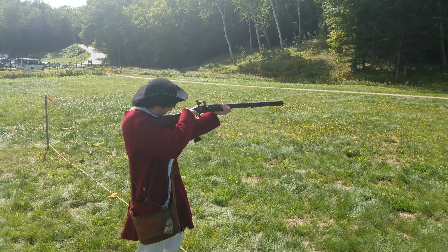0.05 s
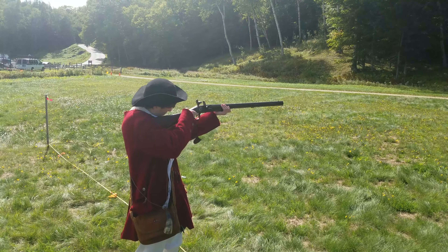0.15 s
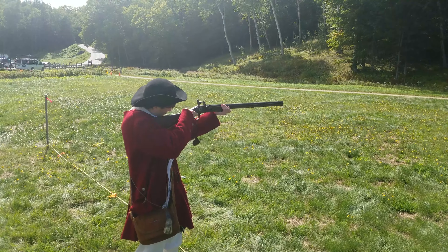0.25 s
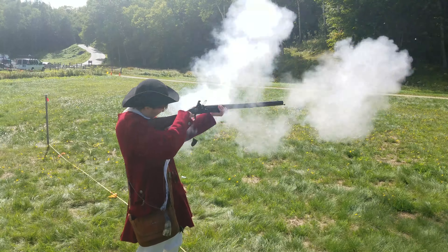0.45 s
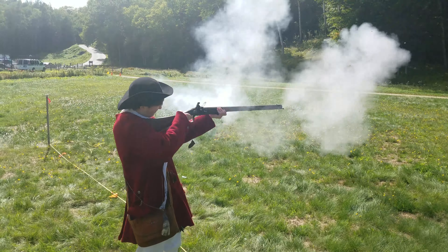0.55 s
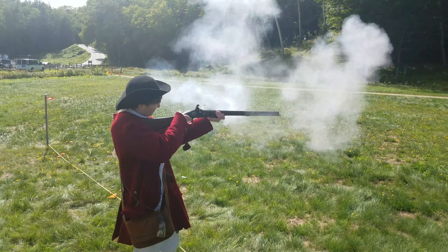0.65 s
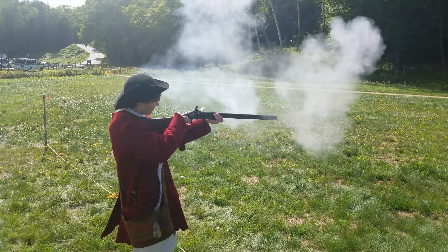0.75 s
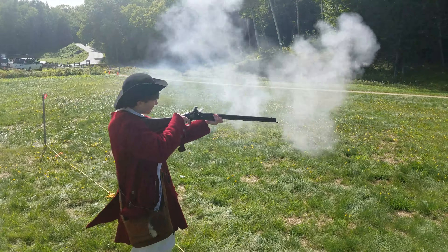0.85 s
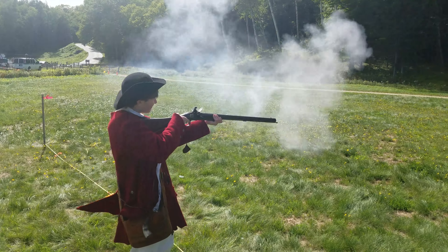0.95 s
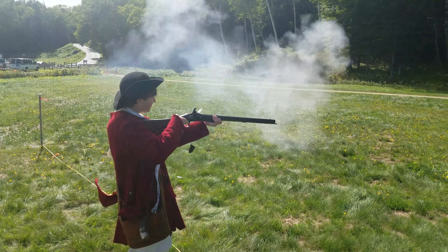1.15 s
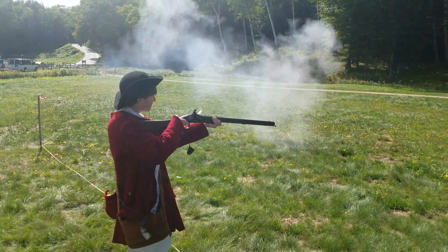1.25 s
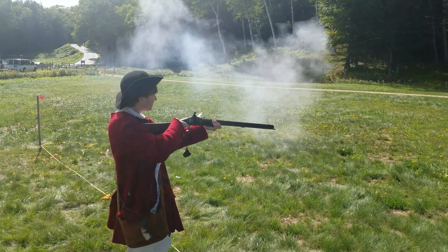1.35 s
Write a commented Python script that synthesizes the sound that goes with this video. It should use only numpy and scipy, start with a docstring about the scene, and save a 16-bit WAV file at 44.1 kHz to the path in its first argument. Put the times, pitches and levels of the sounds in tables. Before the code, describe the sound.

A flintlock musket fires once, close by in an open field. Faint wind brushes the microphone, and the lock scrapes and clicks at 0.2 seconds. At 0.3 seconds comes the loud, sharp, slightly overloaded report with a brief hiss of gas. A crisp echo slaps back near 0.5 seconds, followed by duller echoes from the trees, fading into a faint distant rumble until about 1.4 seconds.

```python
"""Flintlock shot in a meadow

Flint scrapes steel, the priming puffs, and the charge sends out a shock wave that overloads a nearby
microphone; gas hisses out after it. A hard surface slaps the report back, the edge of a wood scatters it
trunk by trunk, and a far slope rumbles last. A light wind brushes the microphone."""
import sys
import numpy as np
from scipy import signal
from scipy.fft import rfft, irfft, next_fast_len
from scipy.io import wavfile

SR = 44100
rng = np.random.default_rng(int(sys.argv[2]) if len(sys.argv) > 2 else 0)


def put_to_file(sound):
    """Save the sound as 16-bit audio at rate SR, in the file named by the first command-line argument."""
    columns = np.atleast_2d(sound).T  # one column per channel
    safe = np.clip(columns, -1, 1)
    whole_steps = np.round(safe * 32767)
    wavfile.write(sys.argv[1], SR, whole_steps.astype(np.int16))


N = 61739

# noise bursts: start/s, attack/s, hold/s, t60/s, level/dB
FLINT = (.197, .014, .003, .07, -23)
FRIZZEN = (.2105, .003, .005, .045, -23)
FIZZ = (.232, .01, .04, .04, -50)
PRIMING = (.259, .008, .014, .07, -33)
VENT = (.2922, .003, .002, .02, -19)
BLAST = (.2972, .0006, .009, .135, -6)
CRACK = (.2975, .0002, .001, .012, -5.5)
THUMP = (.302, .013, .005, .27, -25.5)
GAS = (.31, .02, .033, .16, -23.5)
HISS = (.35, .02, .06, .2, -37)
LOCK_ECHO = (.447, .007, .005, .05, -34)
SLAP = (.4803, .0012, .0029, .009, -10)
SLAP_THUMP = (.4805, .002, .004, .12, -30)
SLAP_TAIL = (.483, .002, .002, .08, -26)
BRUSH = (.49, .028, .03, .1, -33.5)
HOLLOW = (.645, .015, .03, .2, -32)
DEEP_WOOD = (.724, .022, .022, .28, -32)

# spectra of wind and background hiss: f/Hz, relative level/dB
WIND_SPECTRUM = [(20, -12), (70, 0), (140, -2), (300, -14), (600, -22), (2000, -42), (8000, -75)]
AIR_SPECTRUM = [(30, 0), (70, -1), (150, 0), (300, -7), (600, -18), (1500, -24), (4000, -28), (6000, -31),
                (8000, -37), (11000, -38), (15000, -40)]
# spectra of the lock and its priming: f/Hz, relative level/dB
FLINT_SPECTRUM = [(300, -36), (900, -10), (1500, -1), (2400, -1), (3400, -5), (4500, -2), (5300, -3),
                  (6500, -11), (8000, -14), (11000, -5), (15000, -12)]
FRIZZEN_SPECTRUM = [(250, -36), (450, -28), (610, 0), (760, -8), (900, 2), (1100, -8), (1600, -2),
                    (2400, -9), (3400, -11), (5000, -8), (6500, -15), (8000, -20), (11000, -8),
                    (15000, -14)]
PRIMING_SPECTRUM = [(100, -7), (250, 0), (500, -6), (800, -3), (1600, -9), (3000, -19), (5500, -21),
                    (8000, -29), (11000, -26), (15000, -29)]
# spectra of the discharge: f/Hz, relative level/dB
VENT_SPECTRUM = [(100, -14), (350, 0), (1000, 0), (1800, -5), (3000, -9), (4500, -2), (6200, -3),
                 (8000, -18), (11000, -15), (15000, -20)]
BLAST_SPECTRUM = [(40, -20), (100, -8), (200, -4), (360, 2.5), (560, -3), (800, -6), (1100, 3),
                  (1900, -2.5), (2500, -1), (4000, -4), (6500, -7), (7800, -21), (9300, -8), (10500, -7),
                  (15000, -8.5)]
CRACK_SPECTRUM = [(200, -14), (1200, 0), (5500, 0), (7800, -12), (10000, -3), (15000, -4)]
THUMP_SPECTRUM = [(25, -22), (60, -10), (105, 1), (200, -6), (350, -15), (800, -40), (3000, -70)]
GAS_SPECTRUM = [(300, 0), (600, -4), (900, -1), (1800, 0), (2700, -8), (4500, -3), (6500, -3), (8000, -11),
                (9800, -3), (12000, -2), (15000, -4)]
# spectra of the near echoes: f/Hz, relative level/dB
SLAP_SPECTRUM = [(50, -14), (130, -4), (330, 4), (500, -4), (780, -5), (1000, 2), (1500, -4), (2200, -3),
                 (2500, -2), (3050, -9), (3800, -8), (5000, -5), (6200, -7), (8000, -21), (11000, -14.5),
                 (15000, -20)]
SLAP_THUMP_SPECTRUM = [(25, -18), (70, -4), (130, -1), (200, 0), (370, -9), (800, -40), (3000, -70)]
BRUSH_SPECTRUM = [(300, -10), (1000, -8), (2500, -2), (4500, 0), (6300, 0), (8000, -22), (10000, -16),
                  (15000, -24)]
# spectra of the echoes from trees and slope: f/Hz, relative level/dB
WOOD_SPECTRUM = [(50, -20), (130, -14), (220, -20), (330, -5), (600, -3), (850, 2), (1150, 0), (1600, -3),
                 (2300, -5.5), (2900, -13), (4500, -13), (6300, -15.5), (7800, -40), (10000, -30),
                 (12000, -32), (15000, -49)]
TRUNK_SPECTRUM = [(100, -30), (250, -15), (400, -4), (750, 0), (1150, -1), (2200, -11), (5000, -25),
                  (8000, -52), (15000, -75)]
SLOPE_SPECTRUM = [(40, -18), (180, -14), (330, -1), (700, 0), (1100, -5), (2200, -13), (3200, -25),
                  (5500, -39), (8000, -62), (15000, -75)]
HOLLOW_SPECTRUM = [(100, -28), (220, -18), (300, 0), (360, -2), (500, -9), (800, -10), (1500, -28),
                   (6000, -60)]
DEEP_SPECTRUM = [(100, -25), (320, -2), (700, 0), (2300, -2), (3000, -11), (4500, -15), (6300, -21),
                 (8000, -46), (15000, -65)]

# gusts of wind: t/s, level/dB
WIND_LEVEL = [(0, -59), (.08, -51), (.12, -44), (.178, -37), (.2, -48), (.3, -52), (.8, -60), (.98, -52),
              (1.15, -64), (1.33, -46), (1.4, -50)]
# background hiss, sinking after the shot and creeping back: t/s, level/dB
AIR_LEVEL = [(0, -51), (.28, -49.5), (.4, -65), (1.0, -65), (1.2, -61), (1.4, -53)]
# impacts of flint and frizzen: t/s, relative level/dB
LOCK_CONTACTS = [(.2082, -11), (.2128, -1), (.2174, -2), (.2262, -14)]
# modes of lock and stock: f/Hz, relative level/dB, t60/s
STOCK_MODES = [(620, -21, .03), (895, -18, .023), (1370, -24, .03), (1620, -24, .025), (1730, -22, .025),
               (2370, -32, .04), (5130, -29, .04), (11500, -30, .04)]
# reflections of the shock from the ground and things close by: t/s, level/dB
SHOCK_REBOUNDS = [(.3036, -10), (.3085, -7.5), (.3106, -6), (.3192, -11), (.3303, -10)]
# damped tones in the slap: t/s, f/Hz, level/dB, t60/s
SLAP_RINGS = [(.4816, 2520, -11, .008), (.4824, 360, -13, .014)]
# decay of the wood's echo: f/Hz, t60/s
WOOD_DECAY = [(100, .9), (500, 1.0), (1800, .83), (4500, .66), (10000, .53), (15000, .33)]
# strong echoes from single trunks: t/s, relative level/dB, f/Hz
TRUNK_ECHOES = [(.5435, -25, 400), (.5512, -15.5, 790), (.5655, -21, 950), (.5705, -20, 420),
                (.5905, -22, 1100), (.6018, -15, 690), (.604, -22, 380), (.626, -23, 740), (.651, -23, 740),
                (.672, -24, 640), (.820, -28, 640), (.835, -32, 460), (.8645, -30.5, 370), (.869, -34, 560),
                (.882, -36, 390), (.9015, -31.5, 590), (.9088, -31.5, 540), (.94, -36, 640),
                (.949, -36, 380)]
# contour of the far rumble: t/s, relative level/dB
SLOPE_LEVEL = [(.55, -60), (.75, -40.5), (.9, -37.5), (1.0, -38.5), (1.16, -42.5), (1.24, -40),
               (1.3, -37.5), (1.35, -38.5), (1.4, -43)]
# decay of the far rumble, whose treble fades with distance: f/Hz, t60/s
SLOPE_DECAY = [(100, 30), (700, 30), (2000, 10), (4500, 2.6), (9000, 3)]

ECHO_LAG_S, PAN_DB = .00038, -2.4  # the right microphone port hears the wood earlier and louder
TOP_HZ = 15750


def undb(db):
    """Amplitude ratio of a level in decibels."""
    return 10 ** (np.asarray(db) / 20)


def clock():
    """Time of every sample."""
    return np.arange(N) / SR


def curve(points):
    """Gain interpolated along (t/s, level/dB) points."""
    return undb(np.interp(clock(), *np.array(points).T))


def at_hz(points, hz):
    """Interpolation of (f/Hz, value) points on a log-frequency axis."""
    freqs, values = np.array(points, float).T
    return np.interp(np.log(hz + 1e-9), np.log(freqs), values)


def pan(db):
    """Level difference between the ports; positive favours the left."""
    return undb(np.array([[db], [-db]]) / 2)


def colour(x, spectrum):
    """Minimum-phase filter; white noise keeps its power, counted below TOP_HZ."""
    size = 2 * next_fast_len(N)
    hz = np.fft.rfftfreq(size, 1 / SR)
    gain = undb(at_hz(spectrum, hz))
    gain /= np.sqrt(np.mean(gain ** 2 * (hz < TOP_HZ)))
    cepstrum = irfft(np.log(gain))
    cepstrum[1:size // 2] *= 2  # folding onto positive time makes the filter causal
    cepstrum[size // 2 + 1:] = 0
    return irfft(rfft(x, size) * np.exp(rfft(cepstrum)), size)[..., :N]


def ports(lag_s, shared, pan_db):
    """Partly coherent noise at two ports; the shared part reaches the left one late."""
    common = rng.standard_normal(N)
    delay = np.exp(-2j * np.pi * np.fft.rfftfreq(N, 1 / SR) * lag_s)
    coherent = np.array([irfft(rfft(common) * delay, N), common])
    diffuse = rng.standard_normal((2, N))
    return (np.sqrt(shared) * coherent + np.sqrt(1 - shared) * diffuse) * pan(pan_db)


def envelope(start, attack, hold, t60):
    """Linear attack, hold and exponential decay."""
    t = clock() - start
    return np.clip(t / attack, 0, 1) * np.exp(-np.log(1000) * np.maximum(t - attack - hold, 0) / t60)


def burst(row, spectrum, lag_s, shared, pan_db):
    """Transient noise, as of turbulence or friction, shaped in time and then filtered."""
    *timing, db = row
    return undb(db) * colour(ports(lag_s, shared, pan_db) * envelope(*timing), spectrum)


def n_wave(start, length_s):
    """N-wave of a shock: pressure jumps up, ramps below zero and snaps back."""
    u = (clock() - start) / length_s
    return (1 - 2 * u) * ((u > 0) & (u < 1))


def knock(start, hz, db, attack, t60):
    """An echo as a damped sinusoid that reaches the right port first."""
    pair = [np.sin(2 * np.pi * hz * (clock() - s)) * envelope(s, attack, 0, t60)
            for s in (start + ECHO_LAG_S, start)]
    return undb(db) * np.array(pair) * pan(PAN_DB)


def fade(x, t60s, age):
    """Frequency-dependent absorption: each octave band decays at its own rate."""
    octave = np.log2(np.clip(np.fft.rfftfreq(N, 1 / SR), 125, 16000) / 125)
    spectrum, out = rfft(x), 0
    for k in range(8):
        band = irfft(spectrum * np.maximum(1 - abs(octave - k), 0), N)
        out += band * np.exp(-np.log(1000) * age / at_hz(t60s, 125 * 2 ** k))
    return out


def scatter(spread_s, pan_db, per_s=6000, spread_db=3, count=16000):
    """Diffuse scattering: small echoes of random time, strength and direction."""
    when, chance = rng.random((count, 2)).T
    sign, strength, angle = rng.standard_normal((count, 3)).T
    heights = np.sign(sign) * undb(spread_db * strength) * (chance < per_s * N / SR / count)
    right = (when * N).astype(int)
    left = right + np.round((ECHO_LAG_S + spread_s * angle) * SR).astype(int)
    echoes = np.array([np.bincount(i % N, heights, N) for i in (left, right)])
    return echoes / echoes.std() * pan(pan_db)


def breeze():
    """Turbulent pressure buffets the ports, mostly the left, over the faint hiss of the meadow."""
    wind = colour(ports(lag_s=0, shared=.2, pan_db=8), WIND_SPECTRUM)
    air = colour(ports(lag_s=0, shared=.4, pan_db=1.5), AIR_SPECTRUM)
    return wind * curve(WIND_LEVEL) + air * curve(AIR_LEVEL)


def lock():
    """Friction and combustion: flint scrapes, the frizzen snaps open, the priming fizzes and flares."""
    return (burst(FLINT, FLINT_SPECTRUM, lag_s=0, shared=.55, pan_db=-4.5)
            + burst(FRIZZEN, FRIZZEN_SPECTRUM, lag_s=0, shared=.75, pan_db=-4)
            + burst(FIZZ, GAS_SPECTRUM, lag_s=0, shared=.5, pan_db=-3)
            + burst(PRIMING, PRIMING_SPECTRUM, lag_s=0, shared=.8, pan_db=-3.5))


def stock(attack_s=.0016):
    """Impact excitation: metal contacts tick and ring the modes of the lock and its wooden stock."""
    out = 0
    for start, db in LOCK_CONTACTS:
        t = clock() - start
        ring = sum(undb(level) * np.sin(2 * np.pi * hz * t) * envelope(start, attack_s, 0, t60)
                   for hz, level, t60 in STOCK_MODES)
        tick = burst((start, .0002, .0003, .007, -13.5), FLINT_SPECTRUM, lag_s=0, shared=.6, pan_db=-5)
        out += undb(db) * (tick + ring * pan(PAN_DB))
    return out


def shot():
    """Sudden expansion of gas: the vent spits, a shock leaves the muzzle, turbulence roars and hisses."""
    front = undb(4) * n_wave(start=.2969, length_s=.0012)
    rebounds = sum(undb(db) * n_wave(s, length_s=.0017) for s, db in SHOCK_REBOUNDS)
    low_cut = signal.butter(2, 260, "high", fs=SR, output="sos")  # the microphone loses the shock's bass
    return (signal.sosfilt(low_cut, front + rebounds)
            + burst(VENT, VENT_SPECTRUM, lag_s=0, shared=.4, pan_db=-2)
            + burst(BLAST, BLAST_SPECTRUM, lag_s=.0002, shared=.2, pan_db=-.5)
            + burst(CRACK, CRACK_SPECTRUM, lag_s=0, shared=.7, pan_db=-.5)
            + burst(THUMP, THUMP_SPECTRUM, lag_s=.0002, shared=.7, pan_db=-2.5)
            + burst(GAS, GAS_SPECTRUM, lag_s=.00027, shared=.3, pan_db=-3)
            + burst(HISS, GAS_SPECTRUM, lag_s=.00027, shared=.3, pan_db=-3))


def near_echoes(lag_s=.00034):
    """Early reflections: the lock's click off the wood, the report off a hard surface and low brush."""
    return (burst(LOCK_ECHO, WOOD_SPECTRUM, ECHO_LAG_S, shared=.7, pan_db=-3)
            + burst(SLAP, SLAP_SPECTRUM, lag_s, shared=.65, pan_db=-4)
            + burst(SLAP_THUMP, SLAP_THUMP_SPECTRUM, lag_s, shared=.8, pan_db=-6)
            + sum(knock(s, hz, db, attack=.001, t60=t60) for s, hz, db, t60 in SLAP_RINGS)
            + burst(SLAP_TAIL, SLAP_SPECTRUM, lag_s, shared=.5, pan_db=-3)
            + burst(BRUSH, BRUSH_SPECTRUM, lag_s, shared=.4, pan_db=-4))


def wood(start_s=.537, attack_s=.009, hold_s=.035):
    """Backscatter from the tree line: a dense echo that dulls as it comes from deeper in."""
    rise = np.clip((clock() - start_s) / attack_s, 0, 1)
    age = np.maximum(clock() - start_s - attack_s - hold_s, 0)
    echoes = colour(scatter(spread_s=.00004, pan_db=PAN_DB) * rise, WOOD_SPECTRUM)
    return undb(-20.5) * fade(echoes, WOOD_DECAY, age)


def slope(start_s=.537, clumps_per_s=45, clump_db=1.3, count=200):
    """Long-path scattering: distant wooded ground keeps the report rolling and swells once more."""
    clumps = undb(clump_db * np.interp(clock() * clumps_per_s, np.arange(count), rng.normal(size=count)))
    roll = colour(scatter(spread_s=.00012, pan_db=-.8) * clumps, SLOPE_SPECTRUM)
    age = np.maximum(clock(), start_s) - 1.25  # brighter than SLOPE_SPECTRUM before 1.25 s, duller after
    return fade(roll, SLOPE_DECAY, age) * curve(SLOPE_LEVEL) * (clock() > start_s)


def trunks():
    """Discrete reflection: each big trunk returns a dulled shock, a thud and a little scatter."""
    shocks = np.array([sum(undb(db) * n_wave(s + lag, length_s=.0012) for s, db, _ in TRUNK_ECHOES)
                       for lag in (ECHO_LAG_S, 0)])
    tails = sum(undb(db) * envelope(s, attack=.0005, hold=.001, t60=.022) for s, db, _ in TRUNK_ECHOES)
    bark_scatter = ports(ECHO_LAG_S, shared=.9, pan_db=0) * tails
    dulled = colour(undb(-6) * shocks + undb(-5.5) * bark_scatter, TRUNK_SPECTRUM)
    thuds = sum(knock(s, hz, db + 2, attack=.0018, t60=.03) for s, db, hz in TRUNK_ECHOES)
    return thuds + dulled * pan(PAN_DB)


def deep_wood():
    """Propagation delay: trees further in answer later, first hollow and low, then in a broad swell."""
    return (burst(HOLLOW, HOLLOW_SPECTRUM, lag_s=.00036, shared=.85, pan_db=-2)
            + burst(DEEP_WOOD, DEEP_SPECTRUM, lag_s=.00043, shared=.35, pan_db=-1))


def scene():
    """Superposition of wind, lock, shot and echoes in the open air."""
    direct = breeze() + lock() + stock() + shot()
    return direct + near_echoes() + wood() + slope() + trunks() + deep_wood()


def record(dry):
    """Overload and band limiting: the microphone clips the blast and cuts the top."""
    low_pass = signal.ellip(10, .2, 70, TOP_HZ, fs=SR, output="sos")
    return signal.sosfilt(low_pass, np.clip(dry, -1, 1))


dry = scene()
out = record(dry)
put_to_file(out)
```